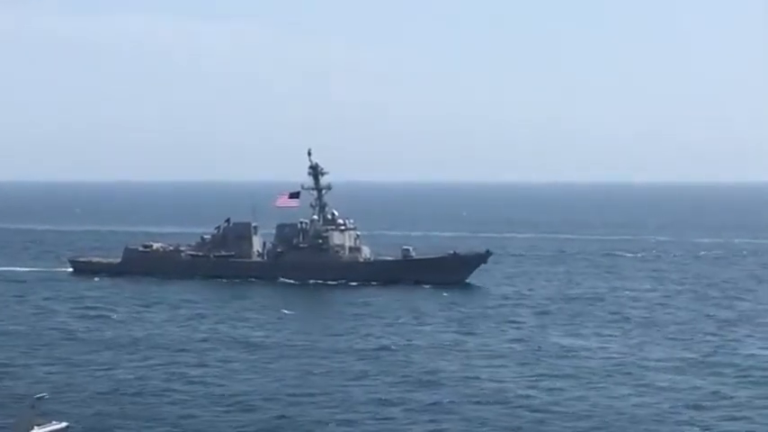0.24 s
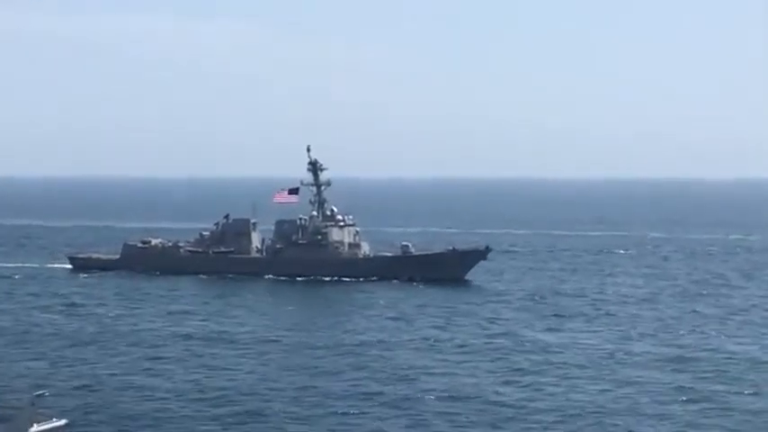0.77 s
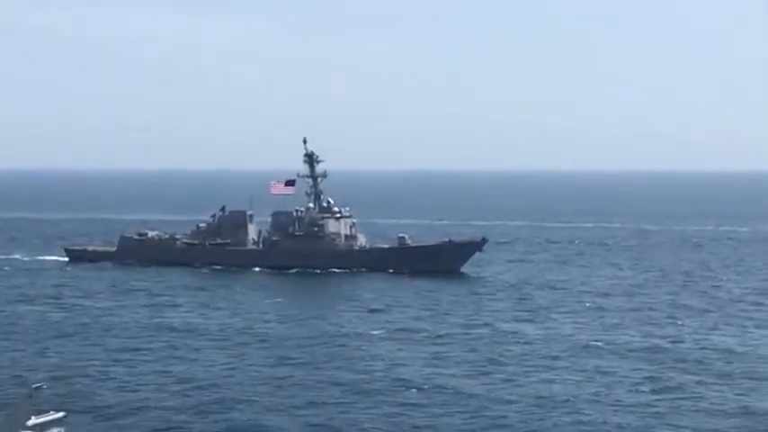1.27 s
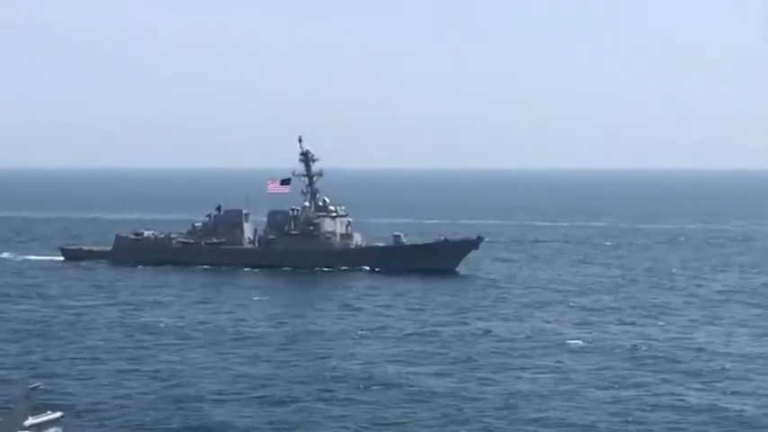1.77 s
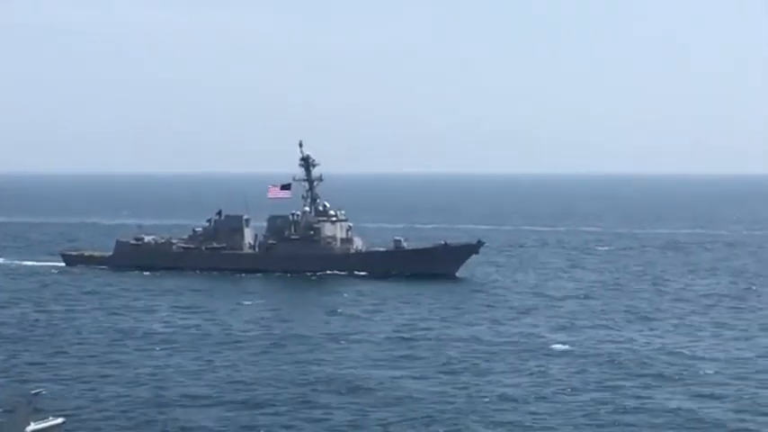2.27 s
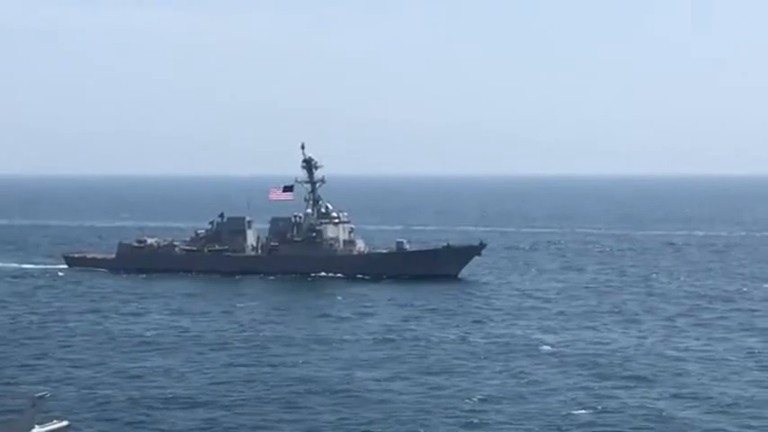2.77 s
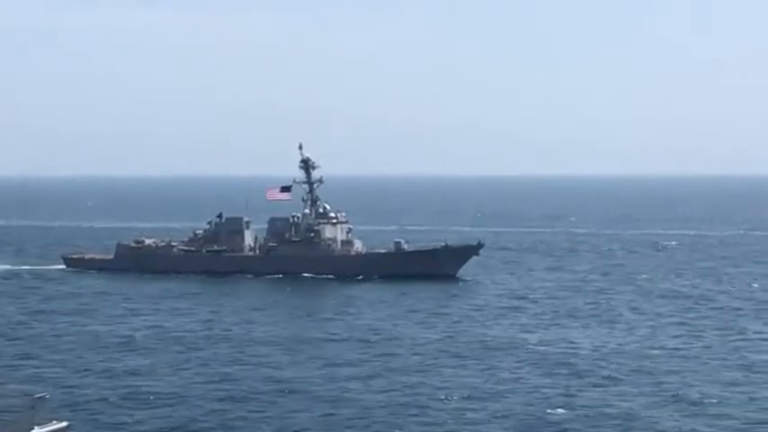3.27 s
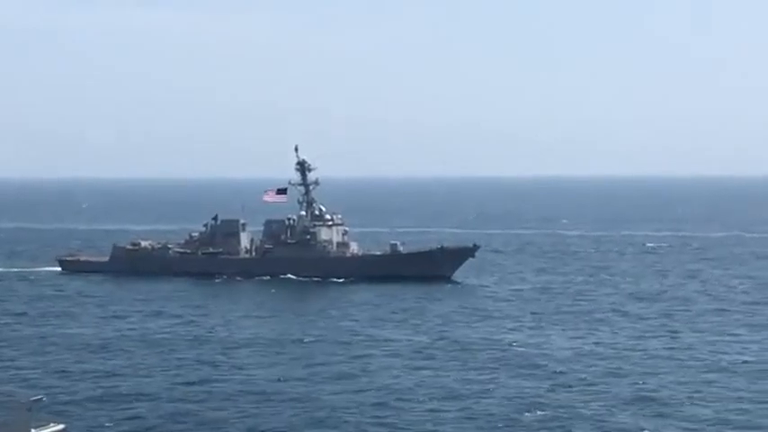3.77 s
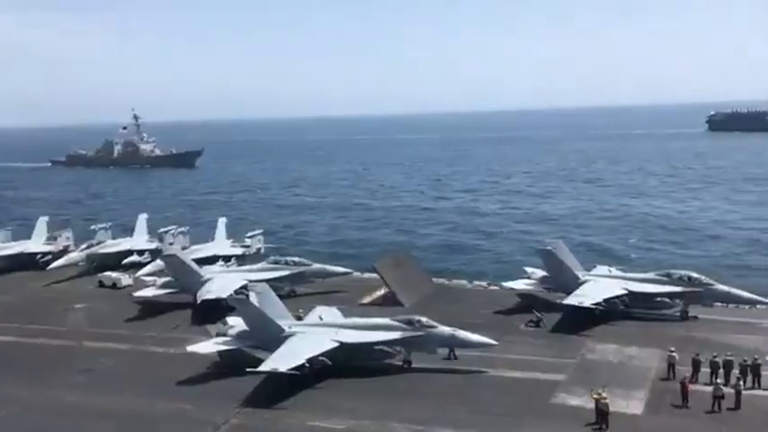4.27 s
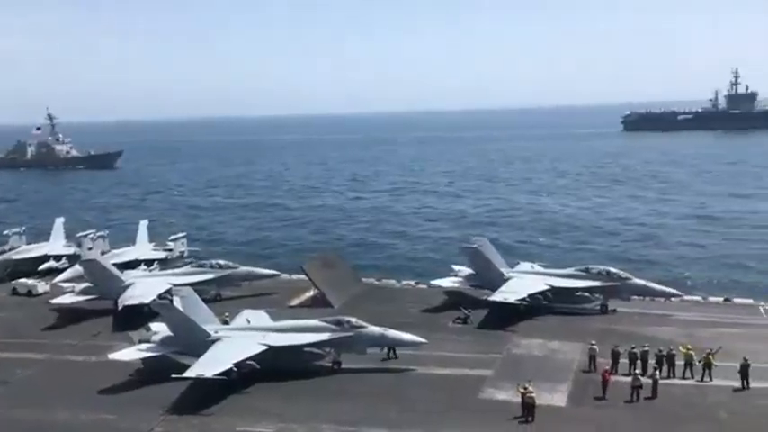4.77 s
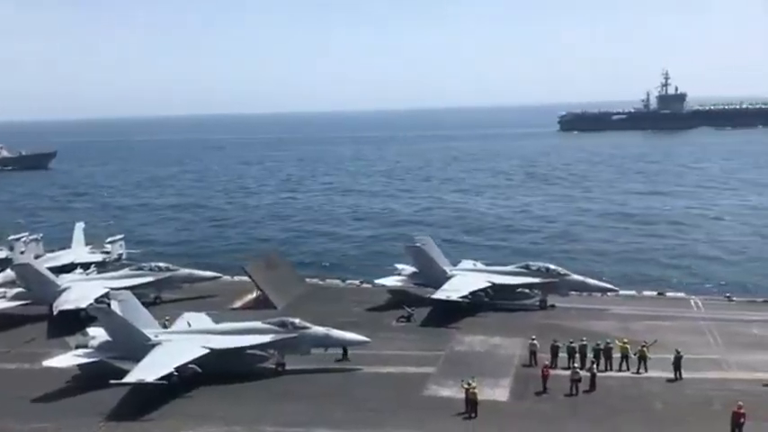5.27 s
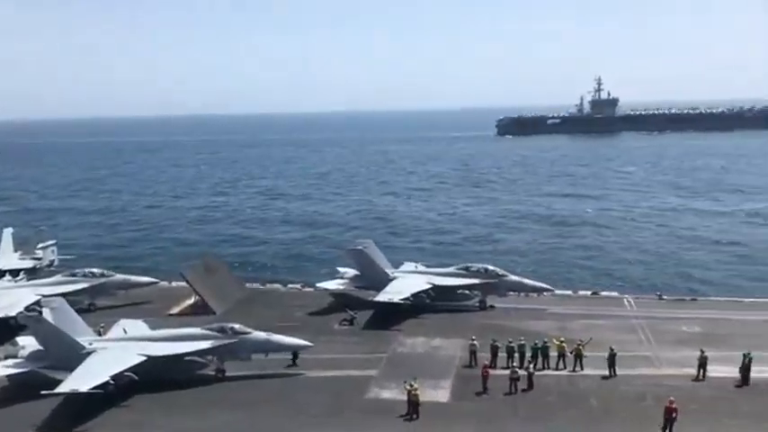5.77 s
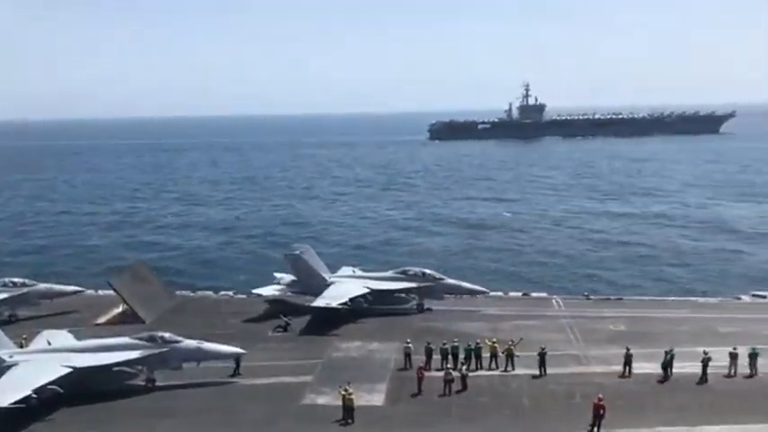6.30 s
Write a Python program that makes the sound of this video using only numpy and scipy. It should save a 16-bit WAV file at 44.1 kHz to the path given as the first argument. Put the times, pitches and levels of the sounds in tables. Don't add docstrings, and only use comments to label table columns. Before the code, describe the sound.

Distant jet turbines whine and shriek over a dull roar and wind rumble, then a hard cut to loud, close exhaust roar with a brief dropout.

```python
import sys
import numpy as np
from scipy import signal
from scipy.fft import irfft, dct, next_fast_len
from scipy.io import wavfile
from scipy.ndimage import uniform_filter1d

SR = 44100
rng = np.random.default_rng(int(sys.argv[2]) if len(sys.argv) > 2 else 0)


def boost(x):
    u = np.asarray(x, float) / 20
    return 10 ** u


def bounce(signal):
    frames = np.transpose(np.atleast_2d(signal))
    limited = np.clip(frames, -1, 1)
    pcm = np.round(limited * 32767).astype(np.int16)
    wavfile.write(sys.argv[1], SR, pcm)


N = 288414
T = np.arange(N) / SR
SCENE_CHANGE_S = 3.9525
SHAFT_HZ = 1008


# t/s, level/dB
FLARES = [(.17, 6), (.42, 9), (.65, 11), (.85, 8), (1.08, 4), (1.18, 8), (1.29, 15.5), (1.4, 13),
          (2.08, 11), (2.23, 13), (2.42, 10), (2.66, 12), (3.01, 8), (3.22, 5), (3.55, 6), (3.77, 5)]
# multiple of the shaft tone, level/dB
SECOND_ORDER = [(2, 0)]


def second_order():
    flare_length_s = 0.046
    level_db = -49 + swells([(s, flare_length_s, db) for s, db in FLARES])
    return boost(level_db) * steadied(orders(SECOND_ORDER, blur=0.0063), share=0.53)


# t/s, length/s, level/dB
FOURTH_SWELLS = [
    (.1, .1, 8),
    (.42, .1, 6),
    (.76, 0.34, 14),
    (1.02, 0.22, 12),
    (1.3, .2, 8),
    (2.02, .16, 14),
    (2.7, .2, 11),
    (3.06, .25, 13),
    (3.62, .2, 11),
]
# multiple of the shaft tone, level/dB
FOURTH_ORDER = [(3.99, 0)]


def fourth_order():
    return boost(-57.5 + swells(FOURTH_SWELLS)) * orders(FOURTH_ORDER, blur=0.0066)


# multiple of the shaft tone, level/dB
MAIN_ORDER = [(5.005, 0)]
# multiple of the shaft tone, level/dB
OTHER_ORDERS = [(3, -6.5), (6, -0.5), (7, -4.5), (8, -9), (9, -14), (10, -18)]


def upper_orders():
    clear_db = clearings_db()
    main = boost(-40 + clear_db) * orders(MAIN_ORDER, blur=0.0098)
    others = boost(-45.5 + 2 * clear_db) * orders(OTHER_ORDERS, blur=0.013)
    return main + others


# f/Hz, spread/Hz, level/dB
SHRIEK = [(11350, 230, 2), (12100, 520, -6)]
# t/s, length/s, level/dB
SHRIEK_BEATS = [(.48, 0.14, 3.5), (.65, .1, -3), (.83, .1, 3.5), (1.25, 0.14, 8), (1.5, .12, 5.5),
                (1.78, 0.092, 5), (2.3, 0.088, 1.5), (2.39, .06, -2), (2.55, 0.087, -3), (2.92, 0.096, -4),
                (3.42, 0.13, 3.5), (3.65, 0.22, 4.5)]


def compressor_shriek():
    return boost(-44.5 + swells(SHRIEK_BEATS)) * tones(SHRIEK)


def whine():
    return second_order() + fourth_order() + upper_orders() + compressor_shriek()


# f/Hz, level/dB
FAR_ROAR = [(65, -63), (110, -18), (135, -18), (172, -0.5), (252, -1.5), (362, -9), (543, -8), (626, -11.5),
            (683, -10), (969, -10), (1500, -26), (1950, -19.5), (3300, -120)]


def far_roar():
    return boost(-30 + surges_db()) * turbulence(FAR_ROAR, patchy_db=0.92, flicker_db=1.02, size=2048)


# f/Hz, level/dB
FAR_HISS = [(1000, -2), (1400, -3.5), (1700, 0.5), (2500, -2), (4600, -4), (5600, -3), (6600, -8.5),
            (7600, -11.5), (9600, -12), (10300, -16.5), (12400, -25), (12600, -11)]


def far_hiss():
    level_db = -35.5 + 0.65 * clearings_db()
    return boost(level_db) * turbulence(FAR_HISS, patchy_db=0.94, flicker_db=1.16)


# t/s, length/s, level/dB
PUFFS = [
    (4.1, 0.099, 1.5),
    (4.92, .1, 0),
    (5.6, 0.098, 1),
    (5.9, 0.32, -1),
    (6.2, .1, 0),
]
# f/Hz, level/dB
NEAR_EXHAUST = [(250, -12), (420, -9.5), (500, -11), (555, -6.5), (732, -6.5), (865, -2.5), (1100, -4),
                (1390, -7.5), (2800, -14), (3640, -17), (6160, -120)]


def near_exhaust():
    return boost(-21 + swells(PUFFS)) * turbulence(NEAR_EXHAUST, patchy_db=1.4, flicker_db=0.8)


# f/Hz, level/dB
NEAR_LOW = [(65, -40), (110, -12), (188, 3.5), (243, -7.5), (290, 2.5), (323, -4.5), (500, -16), (650, -37),
            (1100, -120)]


def near_low_roar():
    return boost(-30 + surges_db()) * turbulence(NEAR_LOW, patchy_db=1.3, flicker_db=2.2, size=2048)


# f/Hz, level/dB
NEAR_HISS = [(1470, -1.5), (2500, -3.5), (4350, -1), (4980, -5.5), (5360, -3.5), (5960, -4), (7840, -10.5),
             (9520, -10.5), (10600, -17), (12000, -13), (12400, -18), (16100, -46), (22000, -120)]


def near_hiss():
    level_db = -25.5 + 0.52 * clearings_db()
    return boost(level_db) * turbulence(NEAR_HISS, patchy_db=1.8, flicker_db=1.14)


# t/s, length/s, level/dB
SURGES = [(.55, .1, -2.5), (1.35, 0.97, 1.1), (2.63, 0.3, -2.5), (3.5, 0.95, 1), (4.2, 0.45, -2),
          (4.59, .2, 6.5), (5.01, 0.071, 4.5), (4.88, .1, -1), (5.2, .1, -6), (5.36, 0.2, 3.5),
          (3.17, 0.094, -0.5), (3.9, 0.16, 1), (4.42, .1, -5), (5.76, 0.38, 4.5), (6.12, .2, 3)]


def surges_db():
    return swells(SURGES)


# t/s, length/s, level/dB
CLEARINGS = [(.43, 0.077, 3), (.72, 0.22, 2), (1.25, 0.21, 1.5), (1.42, 0.18, -1), (1.95, 0.087, 1.5),
             (2.52, 0.11, -2), (2.69, 0.16, 4.5), (3.01, 0.17, 3), (3.72, .12, 0.5), (4.32, .14, 4),
             (4.52, 0.13, -3.5), (4.73, 0.093, 5.5), (4.87, 0.14, 5.5), (5.02, 0.099, -2.5),
             (5.15, 0.074, 3), (5.68, 0.3, -4), (5.9, 0.35, 4.5), (6.47, .15, 3.5)]


def clearings_db():
    return swells(CLEARINGS)


# f/Hz, level/dB
WIND = [(18, -26), (30, -17), (45, -6), (62, -1), (80, 0), (110, -2), (135, -3), (170, -30)]
# t/s, length/s, level/dB
GUSTS = [(.04, .08, 5), (.28, 0.11, 6), (1.35, .3, 4.5), (1.66, .12, -5), (2.2, 0.12, -0.5), (2.5, 0.36, 7),
         (2.7, .1, 3), (3.18, .08, -9), (3.42, 0.36, 5), (3.78, 0.28, -5), (4.15, 0.32, 7), (4.33, .1, -2),
         (4.55, 0.18, 4), (4.95, .08, 3), (5.1, 0.094, 2), (5.35, 0.086, 4), (5.76, 0.44, 8), (6.04, .1, 1),
         (6.2, .1, -2)]


def wind(level_db, patchy_db, flicker_db):
    return boost(level_db + swells(GUSTS)) * turbulence(WIND, patchy_db, flicker_db, size=2048)


def far_view():
    return whine() + far_roar() + far_hiss() + wind(-43.5, patchy_db=1.5, flicker_db=3.5)


def near_view():
    exhaust = near_exhaust() + near_low_roar() + near_hiss()
    return exhaust + wind(-38, patchy_db=0.7, flicker_db=2.5)


def orders(table, blur):
    return tones([(k * SHAFT_HZ, blur * k * SHAFT_HZ, db) for k, db in table])


def tones(peaks):
    size = next_fast_len(N)
    hz = np.fft.rfftfreq(size, 1 / SR)
    a, b = rng.standard_normal((len(hz), 2)).T
    power = sum(boost(2 * db) / spread * np.exp(-((hz - f) / spread) ** 2 / 2) for f, spread, db in peaks)
    return evened(irfft((a + 1j * b) * np.sqrt(power), size)[:N])


def turbulence(spectrum, patchy_db, flicker_db, size=1024):
    hop = size // 4
    frames, hz = N // hop + 5, np.fft.rfftfreq(size, 1 / SR)
    a, b, patches = rng.standard_normal((frames, len(hz), 3)).T
    patches = uniform_filter1d(patches, size=12, axis=0)
    patches = evened(uniform_filter1d(patches, size=12, axis=1))
    flicker = evened(uniform_filter1d(rng.standard_normal(frames), size=6))
    f, db = np.transpose(spectrum)
    colour_db = np.interp(np.log(hz + 1), np.log(f + 1), db, left=-90, right=-90)
    z = (a + 1j * b) * boost(colour_db[:, None] + patchy_db * patches + flicker_db * flicker)
    return evened(signal.istft(z, nperseg=size, noverlap=size - hop)[1][:N])


def swells(rows):
    return sum(db * np.exp(-4 * ((T - s) / length) ** 2) for s, length, db in rows)


def steadied(x, share):
    envelope = abs(signal.hilbert(x, next_fast_len(N))[:N])
    return evened(x / (envelope + 0.11) ** share)


def evened(x):
    return x / np.sqrt(np.mean(abs(x) ** 2) + 1e-20)


def scene():
    return np.tile(np.where(T < SCENE_CHANGE_S, far_view(), near_view()), (2, 1))


LOOSE = [(196, 216, .15), (240, 264, .15), (264, 292, .07), (292, 320, .13), (320, 352, .02),
         (352, 384, .06), (384, 416, .13)]
NOISY = [(416, 448, .17), (448, 480, .18), (480, 512, .12), (512, 544, .2), (544, 576, .15)]
MASKED = [(216, 240), (320, 352)]


def changing_bands(x, offset, loose_db, flip_share, masked_db):
    end_s = 4.28
    window = signal.windows.kaiser_bessel_derived(2048, 4 * np.pi)
    z = lapped(x[:, offset:round(end_s * SR)], window)
    luck, kind = rng.random((z.shape[1], len(LOOSE + NOISY), 2)).T
    luck = np.minimum(luck, np.roll(luck, 1, axis=1))
    noise, change = rng.standard_normal(z.shape), np.zeros_like(z)
    far = np.arange(z.shape[1]) * 1024 < SCENE_CHANGE_S * SR
    for j, (a, b, chance) in enumerate(LOOSE + NOISY):
        band, lost = z[..., a:b], (luck[j] < chance)[:, None]
        hiss = noise[..., a:b] * np.sqrt(np.mean(band ** 2, axis=2, keepdims=True))
        if j < len(LOOSE):
            change[..., a:b] = lost * far[:, None] * boost(loose_db) * np.array([hiss[0], -hiss[0]])
        else:
            flipped = np.array([band[0], -band[1]])
            swapped = np.where((kind[j] < flip_share)[:, None], flipped, hiss)
            change[..., a:b] = lost * (swapped - band)
    for a, b in MASKED:
        size = abs(z[0, :, a:b])
        weak = size < boost(masked_db) * size.max(axis=1, keepdims=True)
        change[..., a:b] -= weak * (z + change)[..., a:b]
    change = unlapped(change, window)
    return x + np.pad(change, ((0, 0), (offset, N - offset - change.shape[1])))


def lapped(x, window):
    frames = np.lib.stride_tricks.sliding_window_view(x, 2048, axis=-1)[:, ::1024] * window
    a, b, c, d = np.split(frames, 4, axis=-1)
    folded = np.concatenate([-c[..., ::-1] - d, a - b[..., ::-1]], axis=-1)
    return dct(folded, type=4, norm="ortho")


def unlapped(z, window):
    u, v = np.split(dct(z, type=4, norm="ortho"), 2, axis=-1)
    frames = np.concatenate([v, -v[..., ::-1], -u[..., ::-1], -u], axis=-1) * window
    head, tail = np.split(frames, 2, axis=-1)
    total = np.pad(head, ((0, 0), (0, 1), (0, 0))) + np.pad(tail, ((0, 0), (1, 0), (0, 0)))
    return total.reshape(2, -1)


# lost/s, back/s
DROPOUT_S = (4.7585, 4.8425)
# t/s, level/dB
GAP_LEVELS = [
    (4.7585, -22),
    (4.768, -24),
    (4.774, -36),
    (4.778, -62),
    (4.797, -64),
    (4.800, -95),
    (4.838, -95),
    (4.840, -54),
    (4.8425, -44),
]


def dropout(x):
    s, db = np.transpose(GAP_LEVELS)
    lost = (T > DROPOUT_S[0]) & (T < DROPOUT_S[1])
    return x * np.where(lost, boost(np.interp(T, s, db)), 1)


def low_pass(x):
    return signal.sosfilt(signal.butter(12, 12510, fs=SR, output="sos"), x)


def record(dry):
    ceiling, edge_hz = boost(-5), 12430
    x = ceiling * np.tanh(boost(1.5) * dry / ceiling)
    lowpass = signal.firwin(1023, edge_hz, window=("kaiser", 9), fs=SR)
    x = signal.oaconvolve(x, lowpass[None], "same")
    x = changing_bands(x, offset=383, loose_db=-7, flip_share=0.5, masked_db=-15)
    return low_pass(dropout(x))


dry = scene()
out = record(dry)
bounce(out)
```